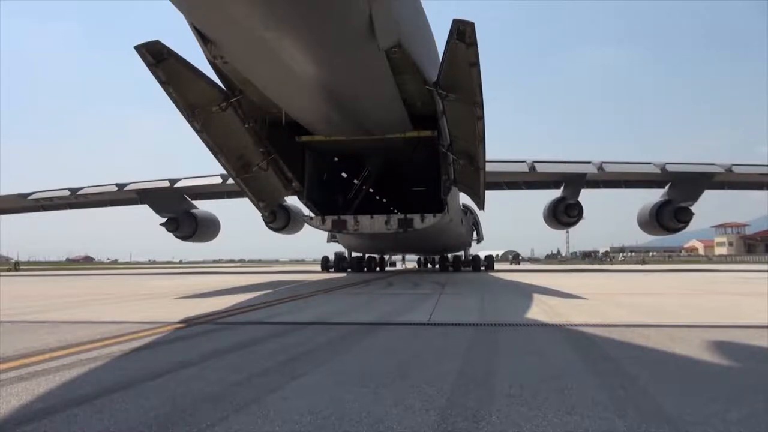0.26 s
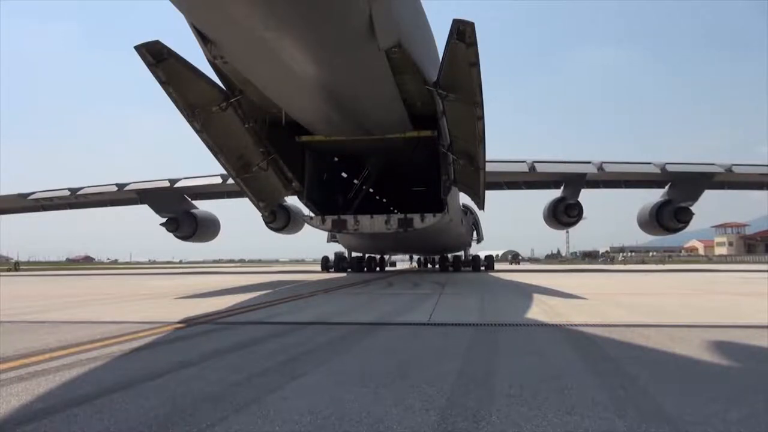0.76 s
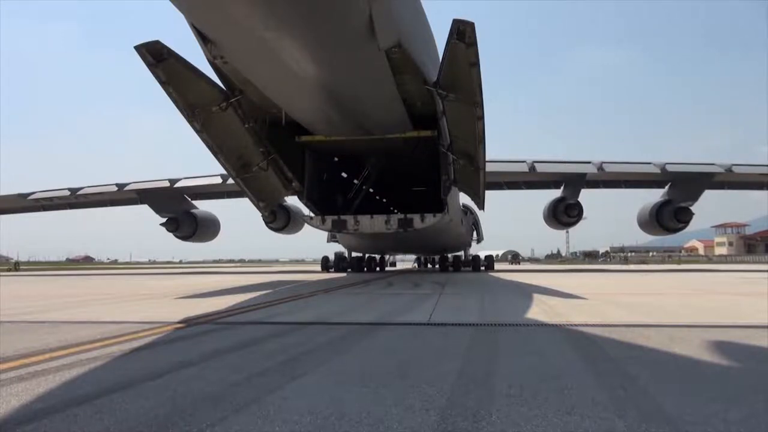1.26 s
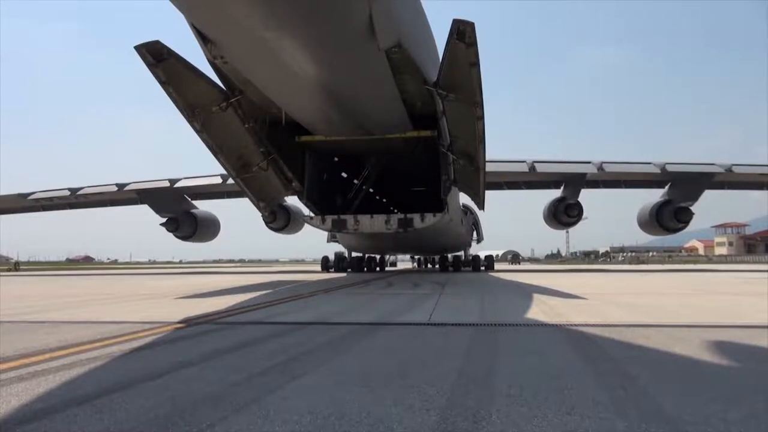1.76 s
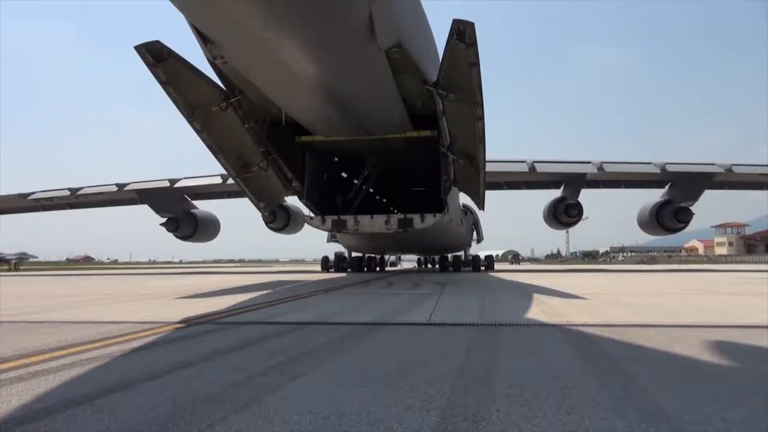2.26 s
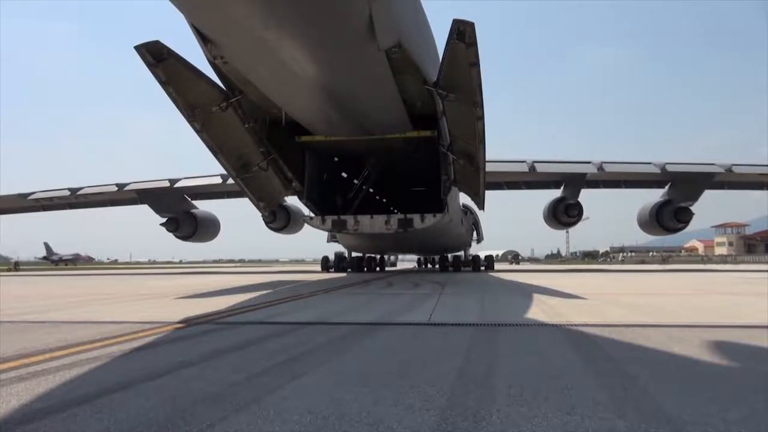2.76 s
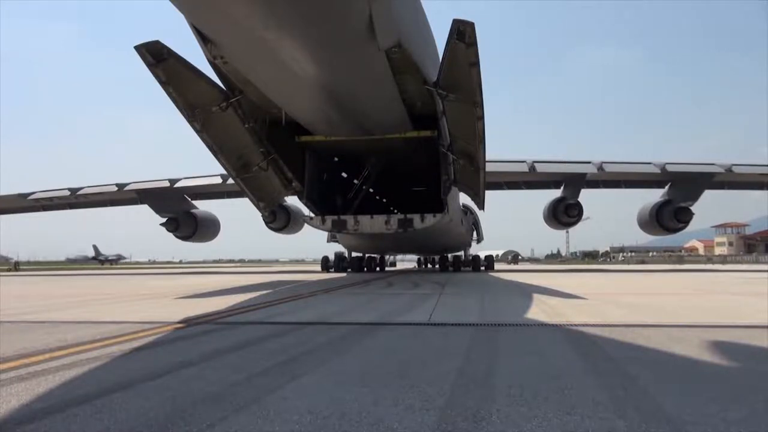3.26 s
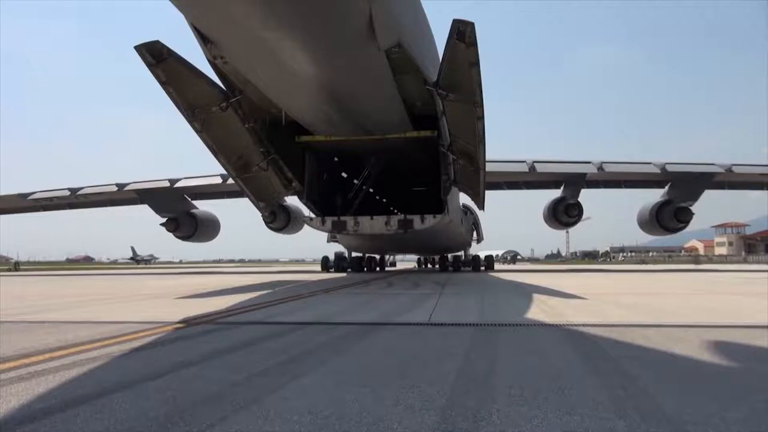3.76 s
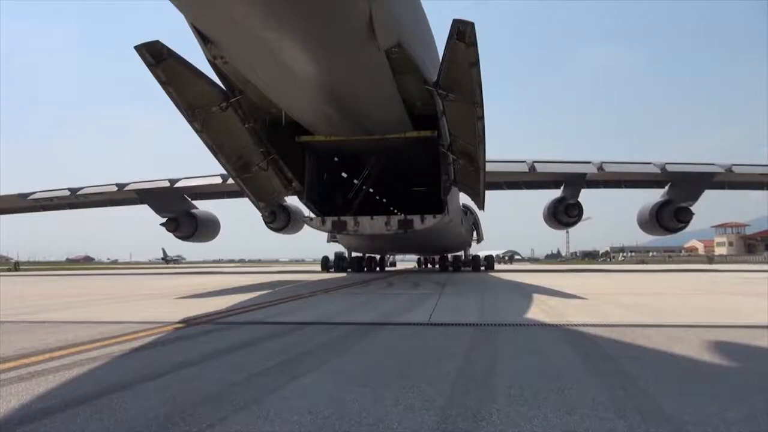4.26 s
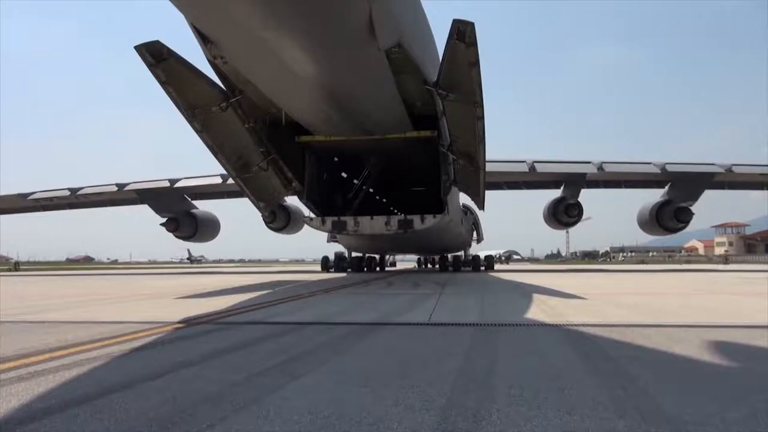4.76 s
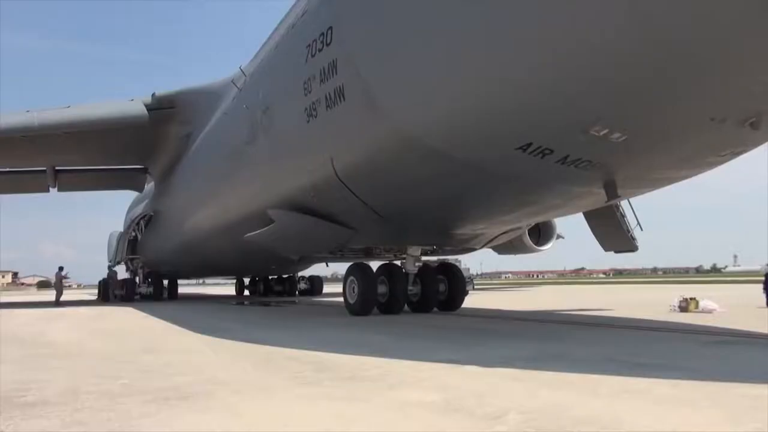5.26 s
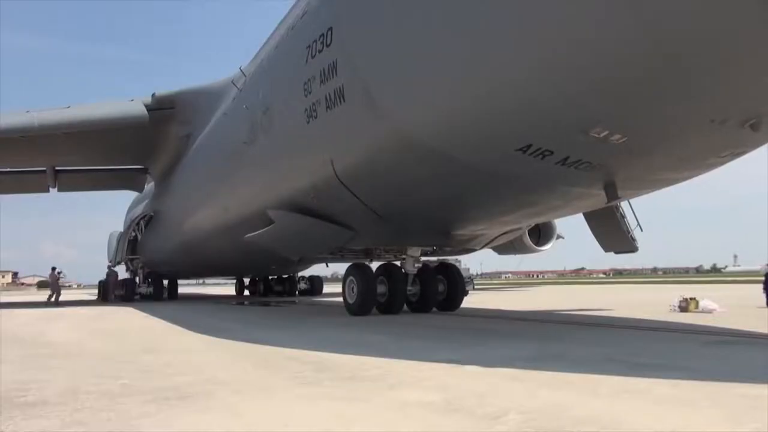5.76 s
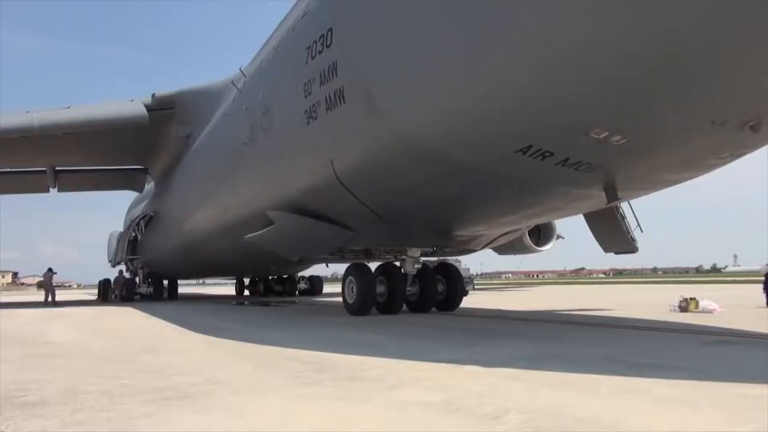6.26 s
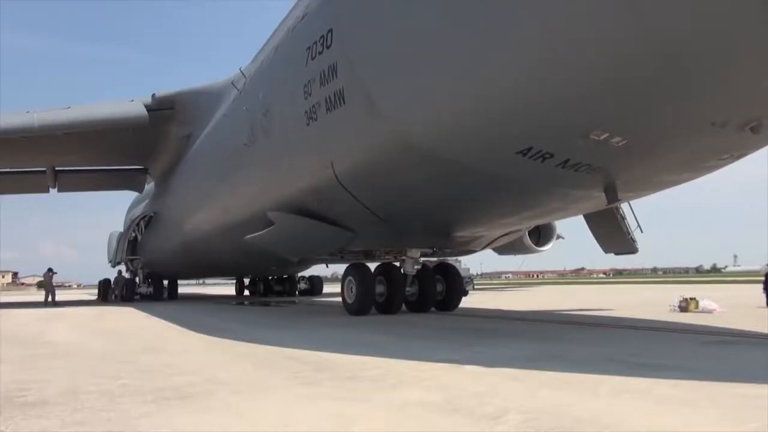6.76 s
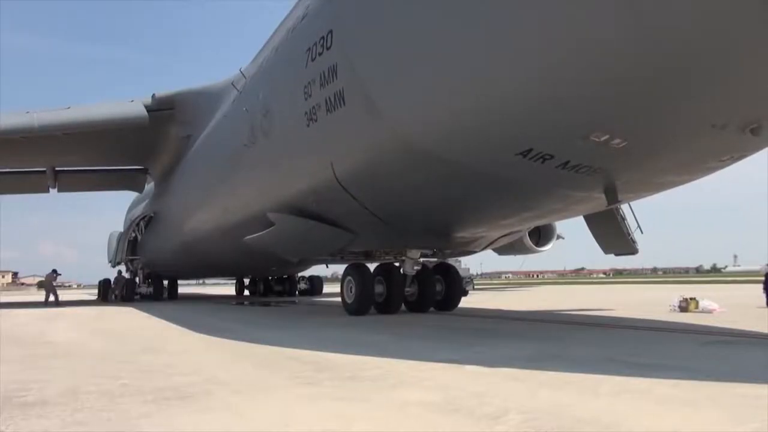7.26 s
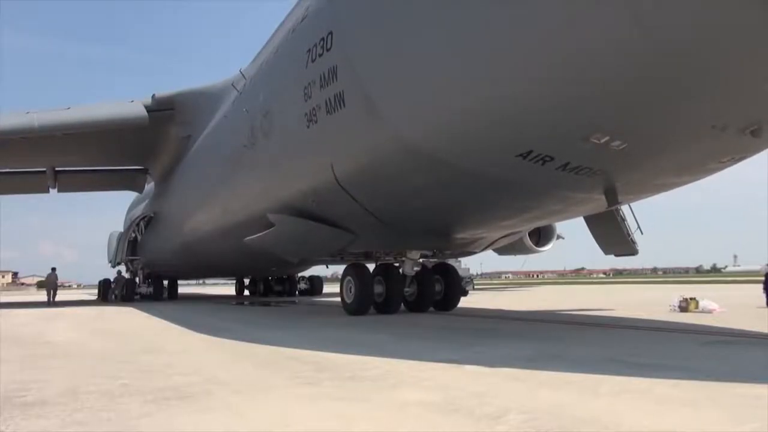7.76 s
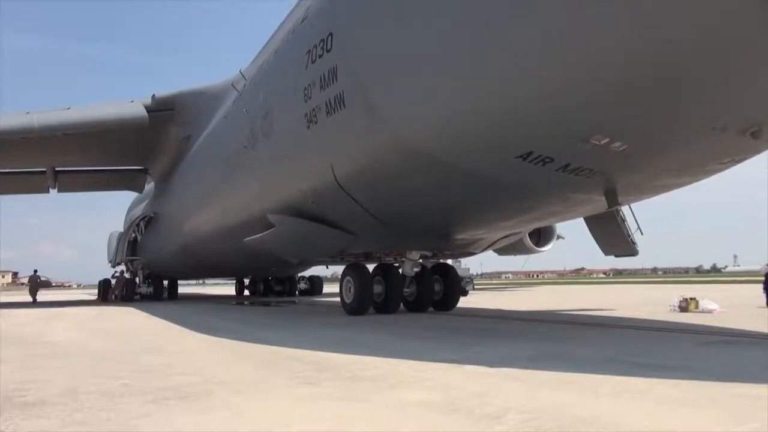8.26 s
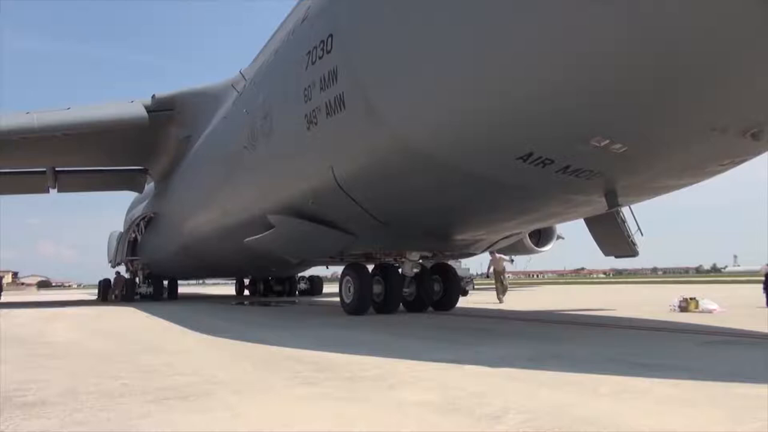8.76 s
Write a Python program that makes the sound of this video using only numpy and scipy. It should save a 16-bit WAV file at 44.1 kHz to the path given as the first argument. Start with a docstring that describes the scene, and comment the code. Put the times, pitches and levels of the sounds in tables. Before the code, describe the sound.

Surging jet engine roar with a piercing whistle and wind rumble cuts suddenly to a softer, hollow hiss with a fading, swelling high tone.

```python
"""Exhaust roar of a big jet transport, standing on an open concrete ramp with its turbines running.
Behind the tail the turbulent jet surges and rasps, with a shrill compressor whistle, steady blade tones,
a rotor whose speed hunts, and gusts on the microphone. Then the listener is abruptly beside the nose:
a thinner, quieter hiss, one whine that fades in and out in the moving air, and at last a faint rumble.
In both places, reflections from the airframe comb the treble of the noise."""
import sys
import numpy as np
from scipy import signal
from scipy.fft import rfft, irfft, next_fast_len
from scipy.io import wavfile

SR = 44100
rng = np.random.default_rng(int(sys.argv[2]) if len(sys.argv) > 2 else 0)


def pcm_store(signal):
    """Save signal as 16-bit PCM."""
    levels = np.round(np.clip(np.atleast_2d(signal), -1, 1) * 32767)
    wavfile.write(sys.argv[1], SR, levels.astype(np.int16).T)


N = 397782
CUTOFF_HZ = 15000


def from_db(db):
    """Amplitude ratio of a level in decibels."""
    return 10 ** (np.asarray(db) / 20)


def unit_rms(x):
    """Normalisation to unit power."""
    return x / np.sqrt(np.mean(x ** 2) + 1e-20)


def curves(rows):
    """Linear interpolation in time, one curve per value column."""
    times, *columns = np.transpose(rows)
    return [np.interp(np.arange(N) / SR, times, column) for column in columns]


def swing(rows):
    """Deviation of a level curve from its mean, in dB."""
    level, = curves(rows)
    return level - level[int(rows[0][0] * SR):int(rows[-1][0] * SR)].mean()


def bumps(rows):
    """Superposed raised-cosine pulses, widths taken at half height; one curve per height column."""
    centre, width, *heights = np.transpose(rows)
    phase = np.clip((np.arange(N) / SR - centre[:, None]) / width[:, None], -1, 1)
    return np.array(heights) @ (.5 + .5 * np.cos(np.pi * phase))


def drift(rate_hz):
    """Low-pass random process of unit rms, changing about rate_hz times a second."""
    hop, settle = 100, 1000
    pole = np.exp(-2 * np.pi * rate_hz * hop / SR)
    white = rng.standard_normal(N // hop + settle + 2)
    slow = signal.lfilter([1], [1, -2 * pole, pole * pole], white)[settle:]
    return np.interp(np.arange(N) / hop, np.arange(len(slow)), unit_rms(slow))


def bin_hz():
    """Fourier frequencies of a span slightly longer than the scene."""
    return np.fft.rfftfreq(2 * next_fast_len(N // 2 + 1), 1 / SR) + 1e-3


def noise_spectrum(colour, peaks=()):
    """Gaussian noise spectrum, shaped by a smooth envelope and by resonances."""
    hz = bin_hz()
    points_hz, points_db = np.transpose(colour)
    db = np.interp(np.log(hz), np.log(points_hz), points_db)
    for centre, width, lift in peaks:
        db = db + lift / (1 + (2 * (hz - centre) / width) ** 2)
    return rfft(rng.standard_normal(2 * (len(hz) - 1))) * from_db(db) * np.sqrt(SR / 2)


def noise(colour):
    """Spectrally shaped noise of unit power."""
    return unit_rms(irfft(noise_spectrum(colour))[:N])


def blade_tone(hz, scatter_db, fading_hz):
    """Multipath fading: sound scattered by eddies interferes with the direct tone. Unit power."""
    paths = 1 + from_db(scatter_db) * (drift(fading_hz) + 1j * drift(fading_hz))
    phase = 2 * np.pi * np.cumsum(hz) / SR
    return unit_rms(np.real(paths * np.exp(1j * phase)))


# Centres of the body, hiss and top ranges: (frequency [Hz])
RANGE_CENTRES = [2400, 4600, 8500]

def through_air(spectrum, swells_db, bass_flicker_db, treble_flicker_db, flicker_hz, count=12):
    """Scintillation: eddies make each band flicker about its range's swell, short waves most."""
    band_position = np.sqrt(bin_hz() / CUTOFF_HZ) * (count - 1)
    out = np.zeros(N)
    for k in range(count):
        height = k / (count - 1)
        band = irfft(spectrum * np.maximum(1 - abs(band_position - k), 0))[:N]
        centre_hz = height ** 2 * CUTOFF_HZ
        shares = np.array([np.interp(centre_hz, RANGE_CENTRES, row) for row in np.eye(3)])
        flicker_db = (bass_flicker_db * (1 - height) + treble_flicker_db * height) * drift(flicker_hz)
        out += band * from_db(shares @ swells_db + flicker_db)
    return out


def off_airframe(x, echo_db, sway_s, corner_hz=1670, count=6):
    """Comb filtering: short waves reflect from hull and wings, and moving air sways the delays."""
    treble = signal.sosfilt(signal.butter(2, corner_hz, "high", fs=SR, output="sos"), x)
    n, out = np.arange(N), x
    for mean_delay_s in np.geomspace(.0021, .017, count) * rng.uniform(.85, 1.15, count):
        delay_s = mean_delay_s + sway_s * drift(.81)
        out = out + from_db(echo_db) * np.interp(n - SR * delay_s, n, treble)
    return out


# Envelope of the rumble: (time [s], level [dB])
RUMBLE_LEVEL = [(5.1, -100), (8.1, -98), (8.45, -86), (8.7, -77), (9.02, -75)]
# Its spectrum: (frequency [Hz], relative density [dB])
RUMBLE_SPECTRUM = [(25, -32), (80, -31), (160, -9), (270, -4), (450, -2), (900, -35)]

def nose_rumble():
    """Faint low-frequency noise under an envelope that rises near the end."""
    return from_db(curves(RUMBLE_LEVEL)[0]) * noise(RUMBLE_SPECTRUM)


# Wind spectrum: (frequency [Hz], relative density [dB])
WIND_SPECTRUM = [(15, -32), (30, -19), (48, 2.5), (75, -1), (120, -2.5), (300, -16), (900, -60)]
# Gusts behind the tail: (time [s], width [s], gain [dB])
WIND_GUSTS = [(.1, 0.65, 12.5), (.75, .5, 14), (1.25, 0.32, 11), (2.42, 0.48, 9), (3.3, .4, 4),
              (4.15, 0.27, 6), (4.78, 0.33, 5)]

def wind(lull_db=-69.5):
    """Turbulent pressure fluctuations: light gusts rumble on the microphone."""
    buffeting = unit_rms(noise(WIND_SPECTRUM) * from_db(3 * drift(10)))
    return from_db(lull_db + bumps(WIND_GUSTS)[0]) * buffeting


# Jet noise beside the nose: (frequency [Hz], relative density [dB])
HISS_SPECTRUM = [(30, -142), (110, -131), (200, -115.5), (370, -99), (650, -95), (820, -91.5), (1050, -88),
                 (1500, -84.5), (2700, -84.5), (3700, -88.5), (5600, -82.5), (7200, -87), (10500, -88),
                 (12300, -91), (15000, -90.5)]
# Its resonances and dips: (frequency [Hz], bandwidth [Hz], gain [dB])
HISS_RESONANCES = [(490, 92, 2.5), (620, 50, -3), (788, 20, 6.5), (872, 57, 6.5), (1020, 80, -2.5),
                   (1213, 170, 7.5), (1318, 94, 6), (1714, 100, 5.5), (2150, 150, 4.5), (2280, 120, -4.5),
                   (2640, 230, 2), (3040, 120, 4), (4370, 340, 3), (4700, 210, 4.5), (5200, 90, -2.5),
                   (5420, 310, 3.5), (6200, 150, 2), (7300, 200, -3)]
# Its envelope: (time [s], relative level [dB])
HISS_ENVELOPE = [(5.3, -44), (5.62, -48), (5.8, -44.5), (6.3, -46), (6.7, -43), (7.1, -45.5), (7.6, -43.7),
                 (8.2, -46.5), (8.42, -43.5), (8.75, -46), (8.97, -42.5)]
# Response of body, hiss and top: (gain [dB], share of the swing [ratio])
HISS_RANGES = [(-0.04, 0.18), (0, 1.05), (-0.65, 0.34)]

def nose_hiss():
    """Acoustic shielding: from the front the jet is a hollow hiss with little bass."""
    swing_db = swing(HISS_ENVELOPE) + .84 * drift(5)
    swells_db = np.array([gain + share * swing_db for gain, share in HISS_RANGES])
    spectrum = noise_spectrum(HISS_SPECTRUM, HISS_RESONANCES)
    hiss = through_air(spectrum, swells_db, bass_flicker_db=-.3, treble_flicker_db=1.5, flicker_hz=24)
    return from_db(-.24) * off_airframe(hiss, echo_db=-18.5, sway_s=.00005)


# Compressor blade-passing rate: (time [s], frequency [Hz])
WHINE_BLADE_RATE = [(5.15, 3808), (5.46, 3833), (5.61, 3806), (6.6, 3819), (7.04, 3802), (7.37, 3828),
                    (7.74, 3799), (8.01, 3823), (9.0, 3806)]
# Weight shifts from octave to fundamental: (time [s], fundamental level [dB], octave level [dB])
WHINE_LEVELS = [(5.1, -55.5, -55), (6.25, -58.5, -55), (6.55, -54, -60), (9.0, -53.5, -57)]
# Focusing and shadowing: (time [s], width [s], fundamental gain [dB], octave gain [dB])
WHINE_FOCUSING = [(5.35, .18, 0, 3), (5.6, 0.088, -2, -3), (5.82, 0.14, -4, 4), (7.22, .06, 5, -3),
                  (7.29, 0.033, -11, 0), (7.55, 0.092, 0, 6), (7.76, 0.2, -9, 4), (7.94, .06, 3, 5),
                  (8.11, 0.036, 5, 0), (8.16, .04, -7, 2), (8.23, .07, 3, 7), (8.95, .07, 4.5, -4)]

def nose_whine(eddy_db=1.8, eddy_hz=11):
    """Refraction: of three fluttering compressor harmonics, moving air swells and fades the lower two."""
    blade_hz = curves(WHINE_BLADE_RATE)[0] + 5.4 * drift(35)
    first_db, second_db = curves(WHINE_LEVELS) + bumps(WHINE_FOCUSING)
    first_db += eddy_db * drift(eddy_hz)
    first = from_db(first_db) * blade_tone(blade_hz, scatter_db=-10, fading_hz=17)
    second_db += eddy_db * drift(eddy_hz)
    second = from_db(second_db) * blade_tone(2 * blade_hz, scatter_db=-7, fading_hz=20)
    third = from_db(-63.5) * blade_tone(3 * blade_hz, scatter_db=-1, fading_hz=14)
    return first + second + third


# Speed excursions: (time [s], width [s], blade-rate drop [Hz], fundamental gain [dB], octave gain [dB])
ROTOR_SAGS = [(.38, .42, 30, 3, 7), (1.38, .45, 28, 4.5, 2), (2.15, .25, -9, 10, 1), (2.87, .45, 34, -1, 8),
              (3.8, .4, 39, 6.5, 10), (4.6, .24, 48, 2, -2), (4.82, .18, 17.5, 8, 13)]

def hunting_rotor(set_hz=857, base_db=-57.5):
    """Hunting: a rotor strays from its set speed and sings out; its octave beats with the fan tone."""
    drop_hz, gain_db, octave_gain_db = bumps(ROTOR_SAGS)
    blade_hz = set_hz - drop_hz
    fundamental = from_db(base_db + gain_db) * blade_tone(blade_hz, scatter_db=-4, fading_hz=3.8)
    octave = from_db(base_db + octave_gain_db) * blade_tone(2 * blade_hz, scatter_db=-9, fading_hz=10)
    return fundamental + octave


# Tones behind the tail: (frequency [Hz], level [dB], rms wander [Hz], wander rate [Hz])
SHAFT_TONES = [(243, -59.5, .7, 3), (5755, -59, 30, 12), (6984, -57, 11, 60), (9039, -49, 5, 30)]
# Envelope of the fan tone: (time [s], relative level [dB])
FAN_ENVELOPE = [(0, -59), (.7, -55), (1.05, -49.5), (1.35, -51), (1.65, -50), (2.4, -48), (2.65, -53),
                (3.35, -54.5), (3.7, -49.5), (4.85, -53)]

def steady_whines(fan_hz=1690):
    """Periodic blade passage: governed shafts and the fan radiate tones of nearly constant pitch."""
    shafts = sum(from_db(db) * blade_tone(hz + wander * drift(rate), scatter_db=-4.5, fading_hz=4)
                 for hz, db, wander, rate in SHAFT_TONES)
    fan = blade_tone(fan_hz + 1.34 * drift(6.6), scatter_db=-11, fading_hz=24)
    return shafts + from_db(curves(FAN_ENVELOPE)[0] + 1) * fan


# Band of the rasp: (frequency [Hz], relative density [dB])
RASP_SPECTRUM = [(4500, -20), (5200, 18), (5750, 21), (6100, -15)]
# Its flares and one slight dip: (time [s], width [s], gain [dB])
RASP_SWELLS = [(.05, .2, 8.5), (1.25, .2, -1), (2.38, 0.36, 17), (4.25, .18, 13)]

def jet_rasp():
    """Amplitude-modulated band noise: the jet flares briefly into a rasp."""
    return from_db(-59 + bumps(RASP_SWELLS)[0]) * noise(RASP_SPECTRUM)


# Jet noise behind the tail: (frequency [Hz], relative density [dB])
ROAR_SPECTRUM = [(25, -100), (50, -90.5), (140, -82.5), (220, -78), (400, -71.5), (620, -72.5),
                 (800, -72.5), (3000, -75.5), (4800, -74), (8000, -77), (10500, -81), (11800, -84.5),
                 (13200, -89.5), (15000, -90)]
# Its resonances and dips: (frequency [Hz], bandwidth [Hz], gain [dB])
# The last is the compressor tone, broadened by turbulence.
ROAR_RESONANCES = [(196, 22, 7), (275, 20, 5), (375, 26, 7), (420, 13, -2), (474, 34, 5.5), (600, 71, 4),
                   (1090, 45, 0), (1920, 51, 1.5), (2105, 26, 1), (2437, 75, 2.5), (5620, 110, 3),
                   (9010, 415, 12.5)]
# Envelope of its hiss: (time [s], relative level [dB])
ROAR_ENVELOPE = [(0, -34.5), (.18, -29), (.4, -34.5), (1.05, -32.5), (1.85, -33.5), (2.1, -35), (3.45, -34),
                 (4.75, -33.5), (5.05, -35.5)]
# Response of body, hiss and top: (gain [dB], surge depth [dB], share of the swing [ratio])
ROAR_RANGES = [(0.38, 0.18, .1), (1.0, .5, 1.0), (0.14, 0.5, .05)]

def exhaust_roar(surge_hz=2.08, crest_s=.927):
    """Turbulent mixing noise: the jet's broadband roar swells and ebbs about twice a second."""
    surge = np.cos(2 * np.pi * surge_hz * (np.arange(N) / SR - crest_s)) + .5 * drift(2.4)
    swing_db = swing(ROAR_ENVELOPE)
    swells_db = np.array([gain + depth * surge + share * swing_db for gain, depth, share in ROAR_RANGES])
    spectrum = noise_spectrum(ROAR_SPECTRUM, ROAR_RESONANCES)
    roar = through_air(spectrum, swells_db, bass_flicker_db=.22, treble_flicker_db=1.5, flicker_hz=12)
    return from_db(-.4) * off_airframe(roar + jet_rasp(), echo_db=-15.5, sway_s=.00008)


def scene(change_s=5.077, crossfade_s=.0085):
    """Superposition at two listening places, first tail, then nose; both channels are alike."""
    tail = exhaust_roar() + steady_whines() + hunting_rotor() + wind()
    nose = nose_hiss() + nose_rumble() + nose_whine()
    at_nose = np.clip((np.arange(N) / SR - change_s) / crossfade_s + .5, 0, 1)
    mono = (1 - at_nose) * tail + at_nose * nose
    return np.array([mono, mono])


def record(dry):
    """Band limiting: an elliptic low-pass filter cuts the top steeply."""
    return signal.sosfilt(signal.ellip(12, .1, 80, CUTOFF_HZ, fs=SR, output="sos"), dry)


dry = scene()
out = record(dry)
pcm_store(out)
```